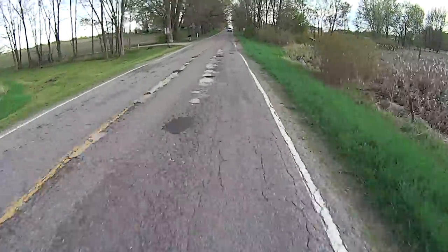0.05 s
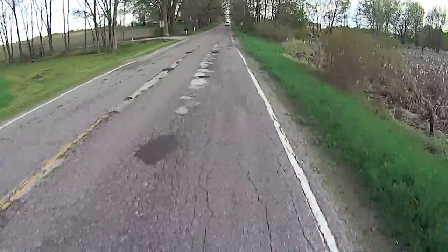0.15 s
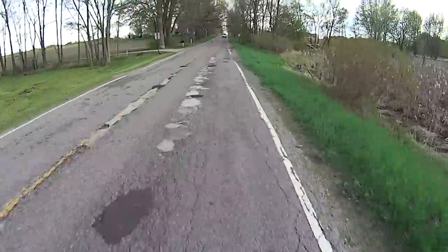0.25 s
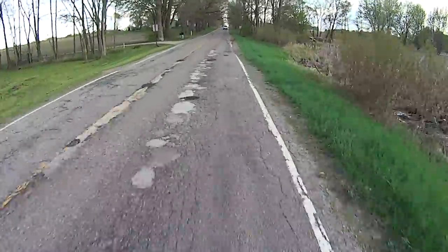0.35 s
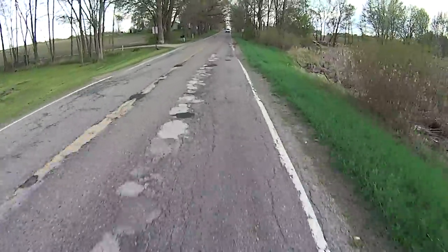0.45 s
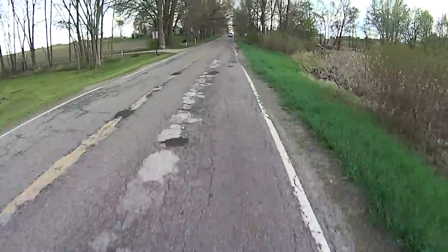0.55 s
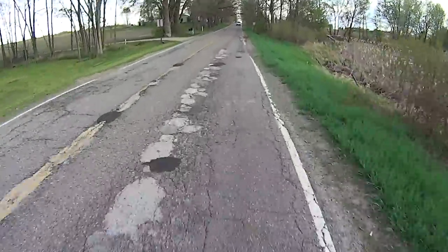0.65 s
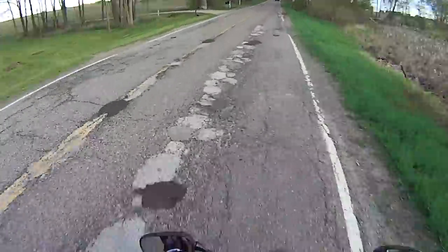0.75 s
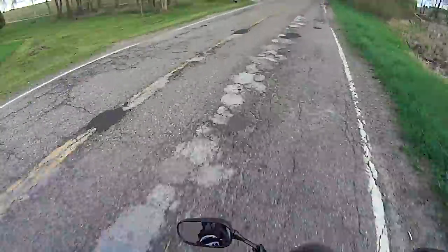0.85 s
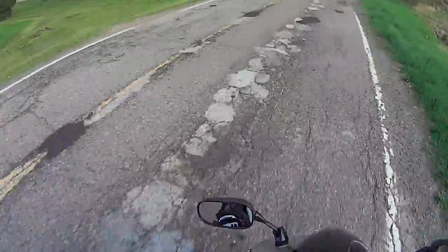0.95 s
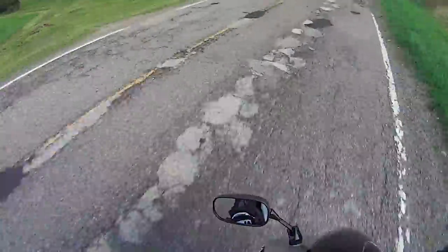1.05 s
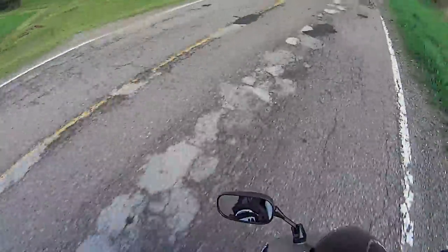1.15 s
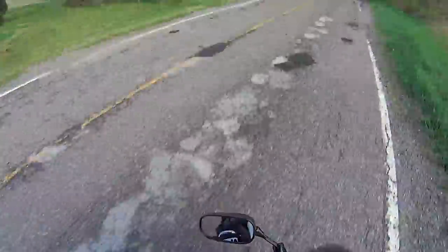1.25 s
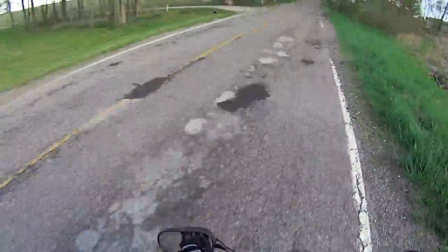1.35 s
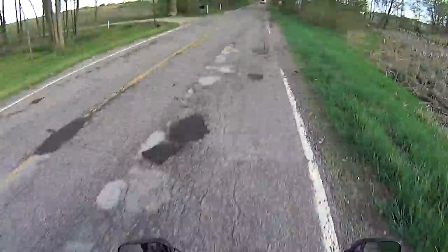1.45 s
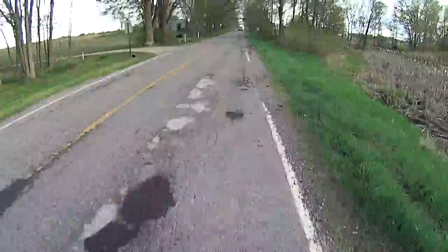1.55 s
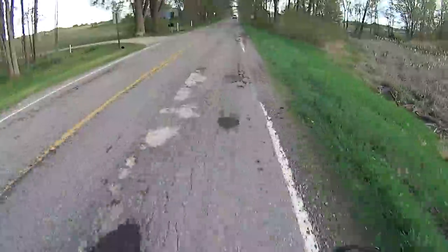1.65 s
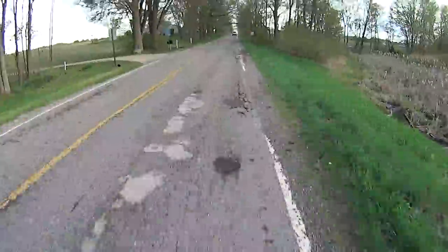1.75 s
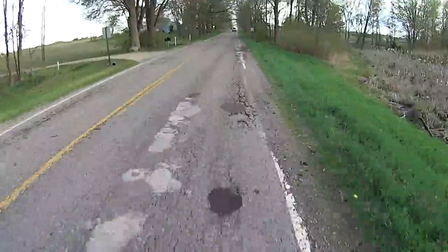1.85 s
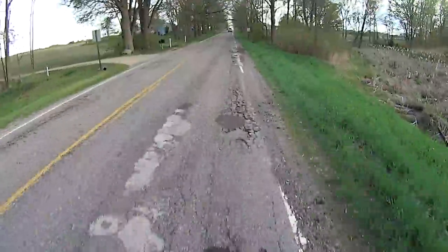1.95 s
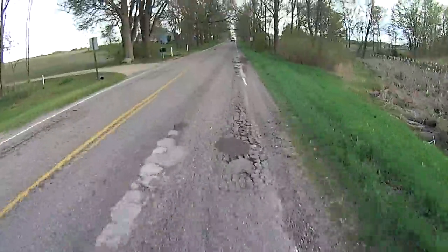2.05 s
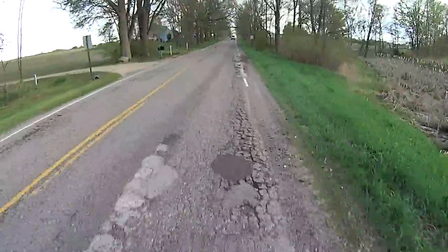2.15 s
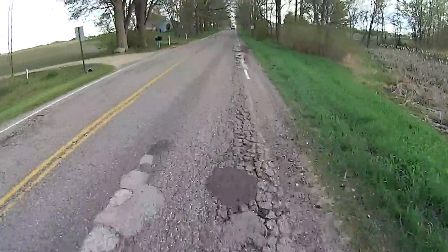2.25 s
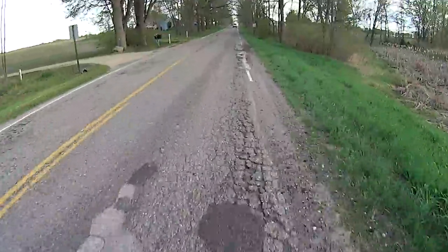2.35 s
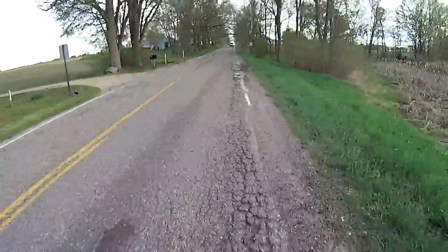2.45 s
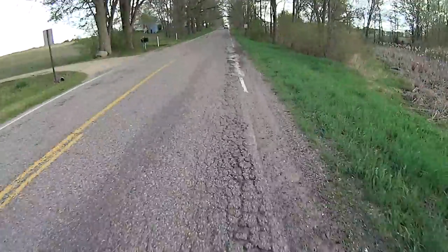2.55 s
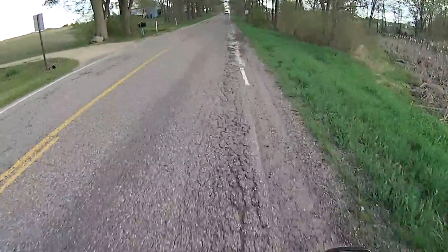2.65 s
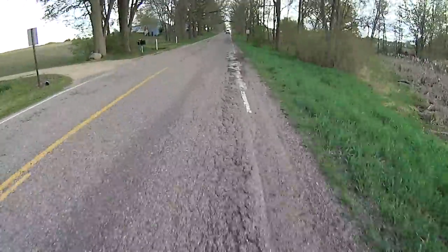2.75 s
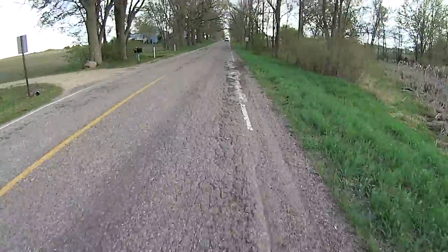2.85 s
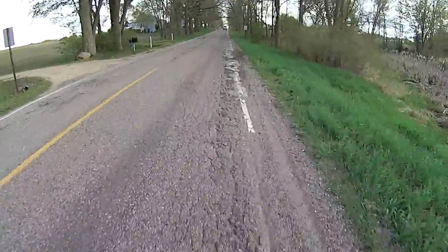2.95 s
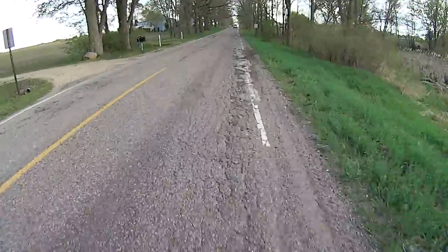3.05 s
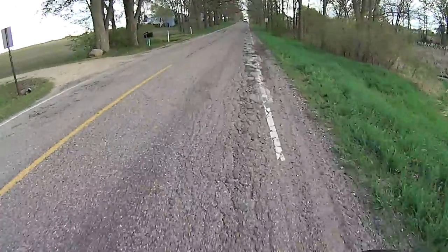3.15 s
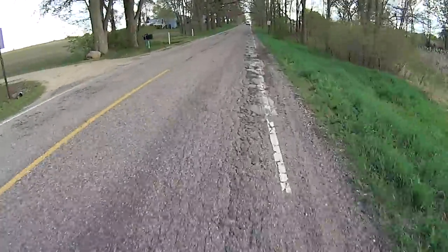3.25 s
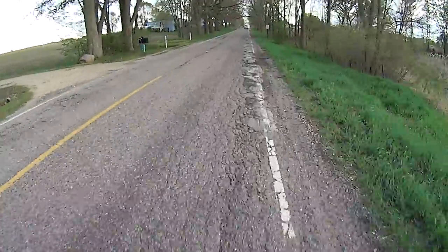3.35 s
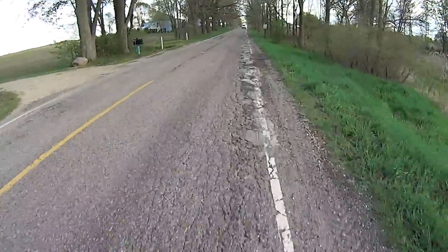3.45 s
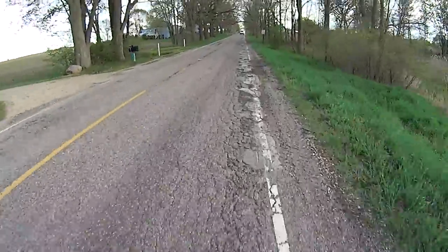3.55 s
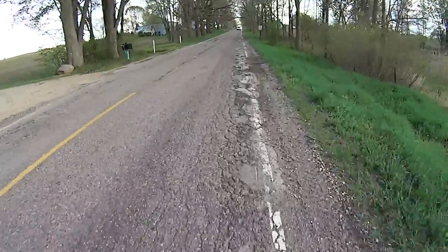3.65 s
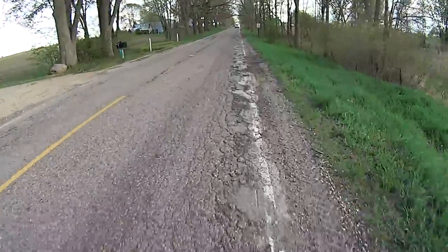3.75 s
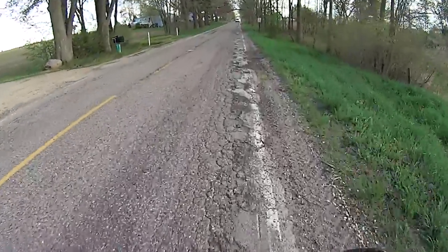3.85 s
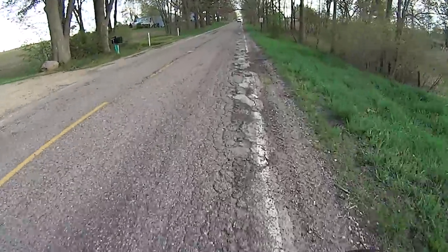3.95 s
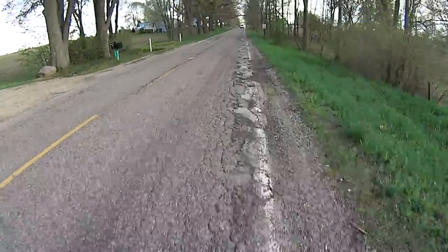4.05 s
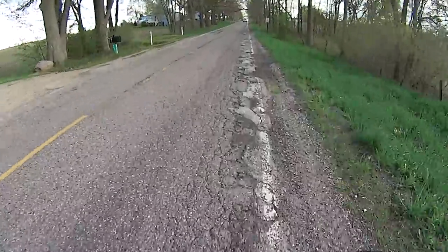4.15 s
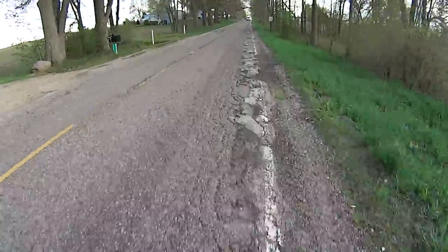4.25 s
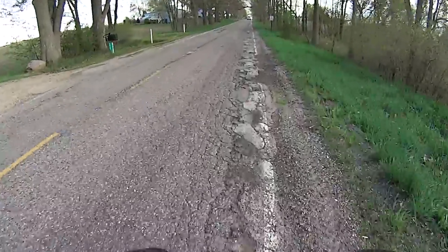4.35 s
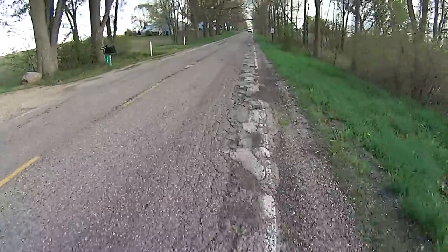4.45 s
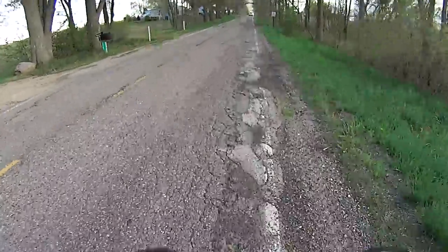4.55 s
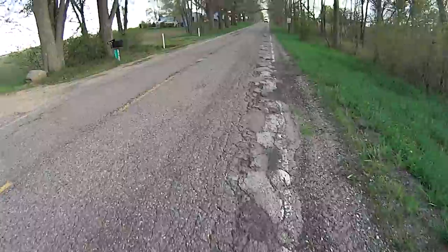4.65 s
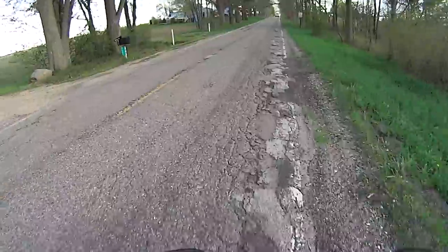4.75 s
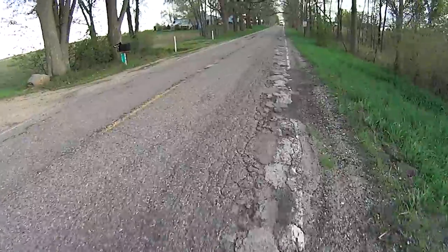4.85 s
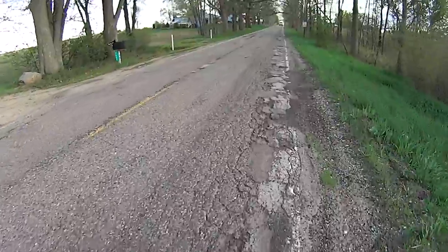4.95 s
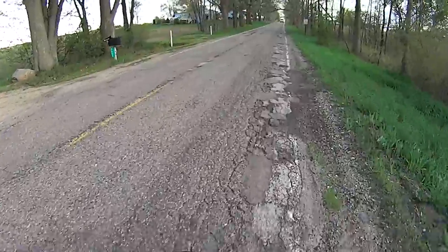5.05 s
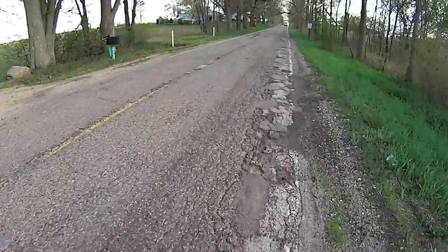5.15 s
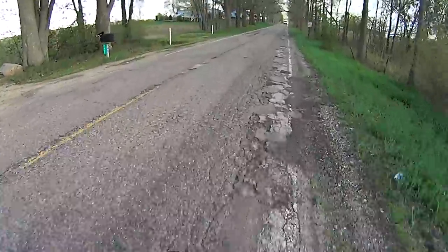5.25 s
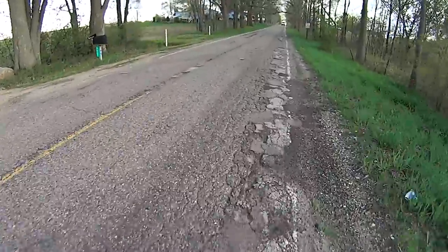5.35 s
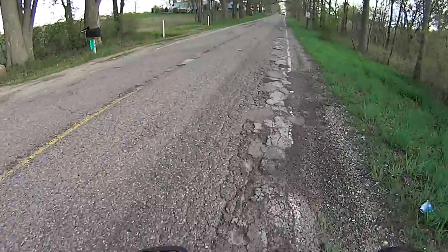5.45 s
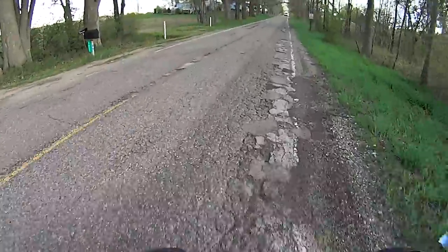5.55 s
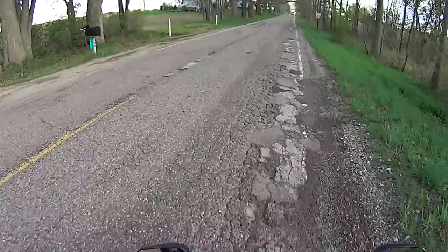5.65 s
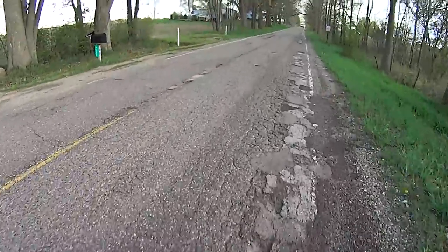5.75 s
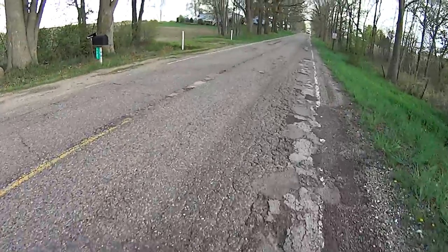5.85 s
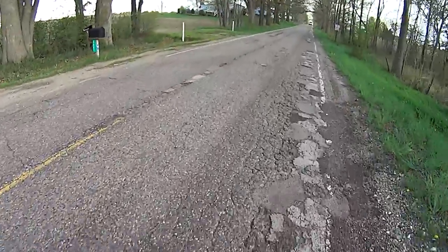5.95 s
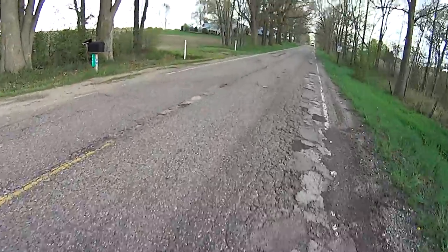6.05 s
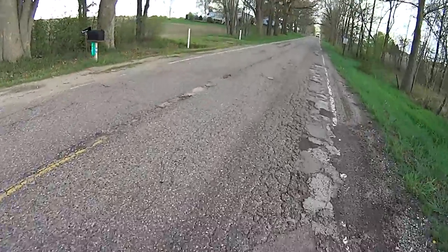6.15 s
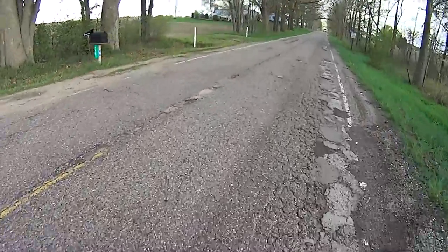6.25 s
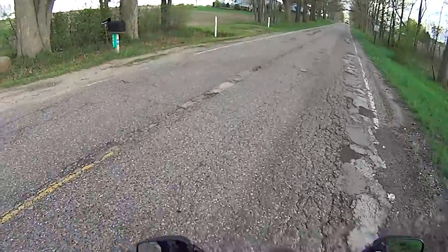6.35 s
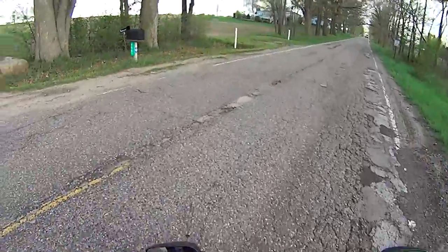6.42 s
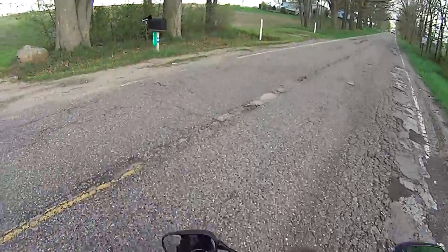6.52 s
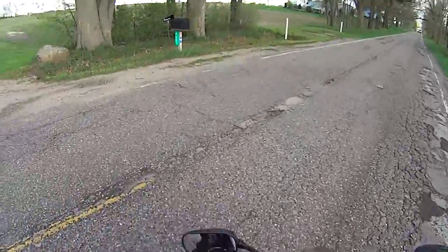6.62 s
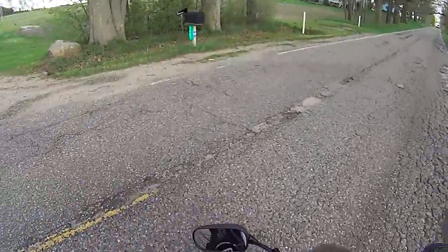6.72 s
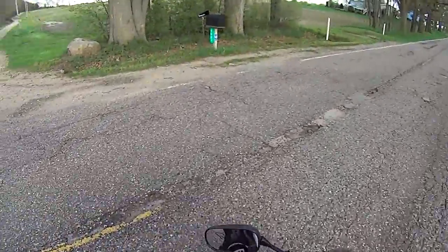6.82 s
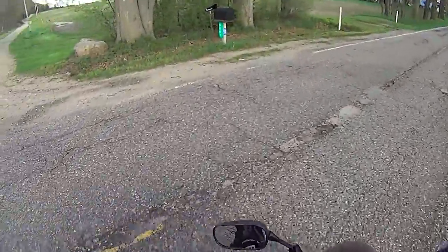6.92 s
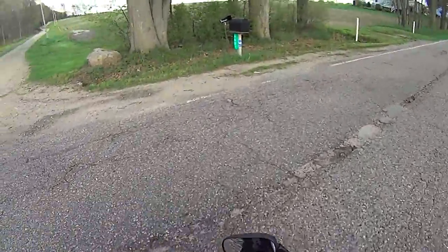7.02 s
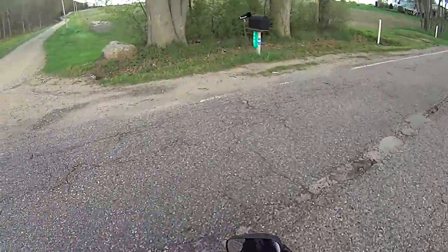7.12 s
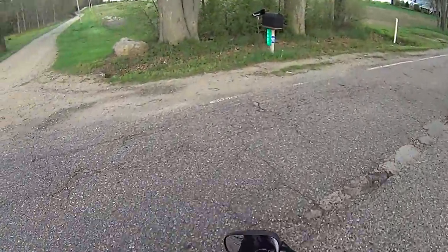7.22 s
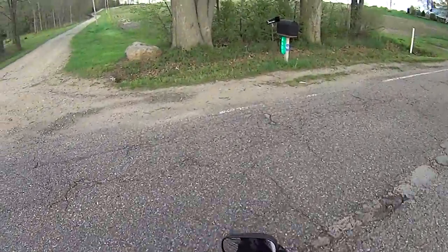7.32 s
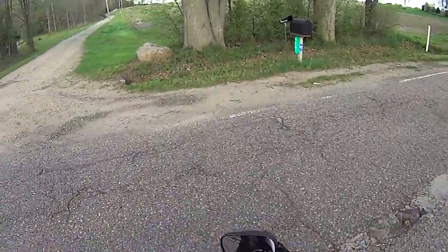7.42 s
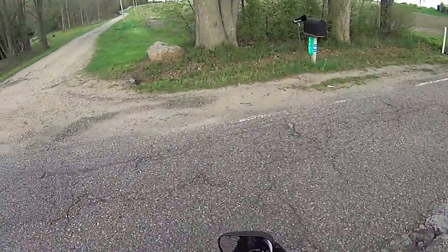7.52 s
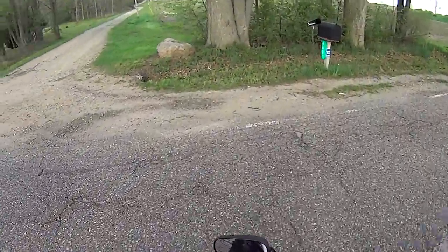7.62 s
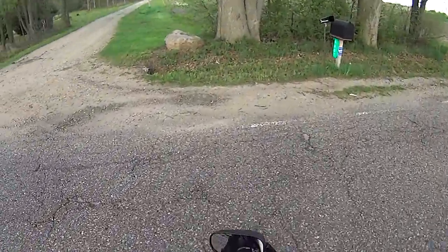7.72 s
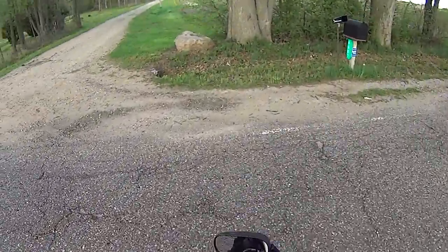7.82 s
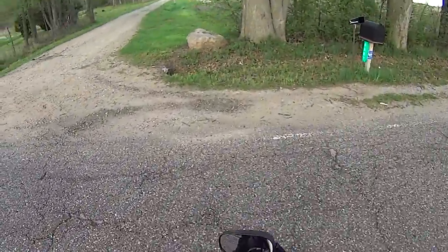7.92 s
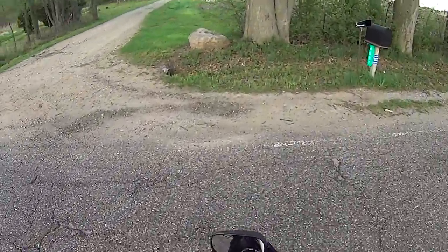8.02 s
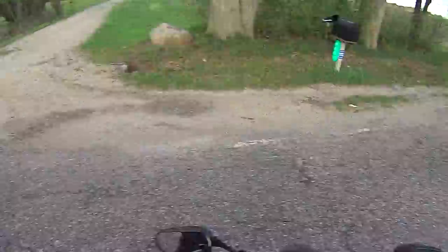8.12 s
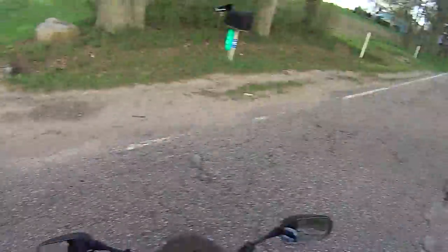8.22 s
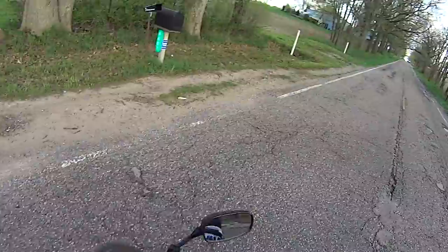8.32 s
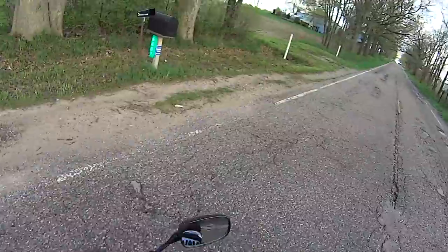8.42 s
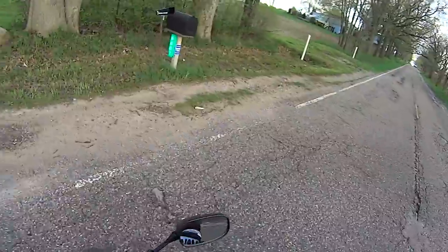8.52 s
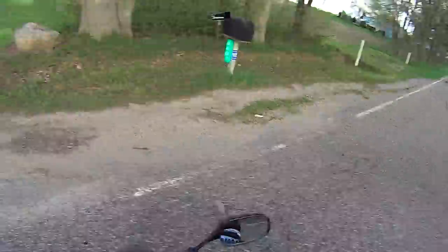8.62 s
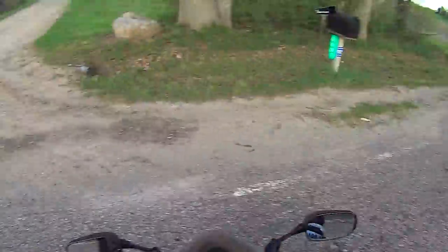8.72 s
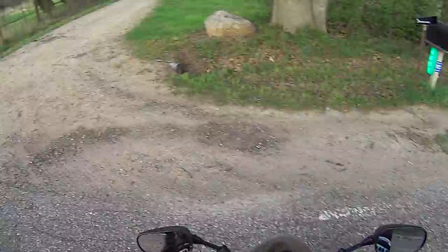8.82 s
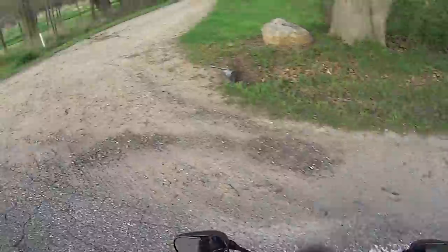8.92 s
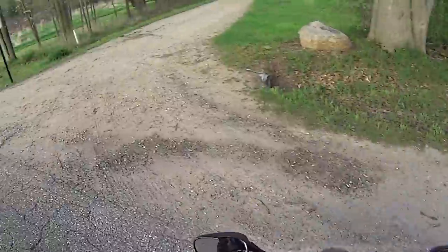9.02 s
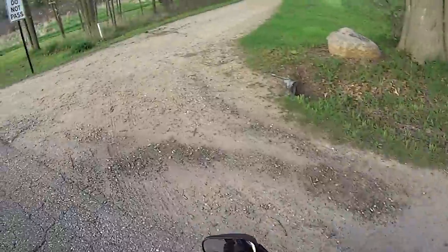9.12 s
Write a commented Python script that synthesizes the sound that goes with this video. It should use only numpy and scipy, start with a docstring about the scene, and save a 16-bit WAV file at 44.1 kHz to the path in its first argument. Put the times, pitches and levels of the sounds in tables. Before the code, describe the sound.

Close on a motorcycle, from a microphone in a hollow plastic case: strong wind rush with a breathy whistle and chain rattle. The engine hums lower, jumps up at a downshift, then sinks to a steady idle. Sharp plasticky clacks and dull thuds punctuate the slowing ride over broken asphalt. Wind thins out, leaving mechanical chatter, faint brake chirps and soft hiss.

```python
"""A motorcycle coasts down a cracked country road to walking pace, heard by a rider's camera in a plastic case.
The engine drops a gear and falls to idle: sines at its orders slide through exhaust resonances, over ticks and grains.
Wind, tyre rumble and chain rattle are shaped noise or grains that fade with the speed; cavities whistle in the air.
Clacks from the slack drive ring the modes of the case; dull knocks, heaves and shaking come through the mount.
The brake disc chirps in narrow bands of noise, over a steady soft hiss."""
import sys
import numpy as np
from scipy import signal
from scipy.fft import rfft, irfft, next_fast_len
from scipy.io import wavfile
from scipy.ndimage import uniform_filter1d

SR = 44100
rng = np.random.default_rng(int(sys.argv[2]) if len(sys.argv) > 2 else 0)


def persist_wave(psi):
    """Save psi, clipped to +-1, as 16-bit WAV."""
    counts = np.round(np.clip(psi, -1, 1) * 32767).astype(np.int16)
    wavfile.write(sys.argv[1], SR, np.atleast_2d(counts).T)


N = 404827
TIME = np.arange(N) / SR  # s
SIZE = next_fast_len(N + 16384, real=True)  # padded so that filter tails do not wrap round
FREQ = np.maximum(np.arange(SIZE // 2 + 1) * SR / SIZE, 1)  # Hz


def undb(db):
    """Decibels to gain."""
    return 10 ** (np.asarray(db) / 20)


def power_db(ratio, power):
    """Decibels gained by a level that goes as a power of a ratio."""
    return 20 * power * np.log10(np.maximum(ratio, 1e-3))


def unit(x):
    """Scale to rms 1."""
    return x / np.sqrt(np.mean(x ** 2))


def curves(table):
    """The columns of a table, joined by straight lines in time."""
    s, *columns = np.transpose(table)
    return [np.interp(TIME, s, column) for column in columns]


def swell(centre_s, length_s):
    """A bell-shaped rise and fall, down to 1/e at length_s either side of its centre."""
    return np.exp(-((TIME - centre_s) / length_s) ** 2)


def noise():
    """White noise."""
    return rng.standard_normal(N)


def walk(rate):
    """Random levels held 1 / rate s and slewed twice; spread near 1."""
    hold = int(SR / rate)
    held = np.repeat(rng.standard_normal(N // hold + 1), hold)
    return 1.3 * uniform_filter1d(uniform_filter1d(held, hold), hold)[:N]


def shape(x, response):
    """Filter by a frequency response."""
    return irfft(rfft(x, SIZE) * response, SIZE)[..., :N]


def resonance(f, hz, width):
    """A resonance applied twice, so that its skirts are steep."""
    return (1 + 1j * (f / hz - hz / f) * hz / width) ** -2


def ports(pan_db, lead):
    """Gain and phase with which a mode reaches the two microphone ports, left then right."""
    side = np.array([[1], [-1]]) / 2
    return undb(side * pan_db) * np.exp(1j * side * lead)


def body(modes):
    """Causal stereo response of a set of modes; at each frequency the strongest ones set the direction."""
    hz, width, db, pan_db, lead = np.transpose(modes)[..., None]
    f = FREQ[::16]
    power = (undb(db) * abs(resonance(f, hz, width))) ** 2 + 1e-9
    total = power.sum(0)
    share = power / total
    phase = np.unwrap(np.angle((share * np.exp(1j * lead)).sum(0)))
    log_gain = np.interp(FREQ, f, np.log(total) / 2)
    pan_db = np.interp(FREQ, f, (share * pan_db).sum(0))
    phase = np.interp(FREQ, f, phase)
    # minimum phase: the ring follows the blow
    cepstrum = irfft(log_gain, SIZE)[:SIZE // 2]
    cepstrum[1:] *= 2
    return np.exp(rfft(cepstrum, SIZE)) * ports(pan_db, phase)


def add(out, s, sound):
    """Mix a short sound in at time s."""
    i = max(int(s * SR), 0)
    out[..., i:i + sound.shape[-1]] += sound[..., :N - i]


# the bike slowing down: (time [s], road speed [m/s])
ROAD_SPEED = [(0, 13.7), (.33, 13.2), (.72, 10.9), (1.05, 8.77), (2.0, 7), (3.3, 5.3), (4.1, 3.65),
              (6.2, 3.18), (7.2, .9), (9.18, 1.55)]
REFERENCE_M_S, BREEZE_M_S = 14.26, 4.37  # speed at which levels are given; air that moves even at rest


def pace_and_airflow():
    """Road speed and air speed over the reference speed; the breeze adds to the air in quadrature."""
    speed, = curves(ROAD_SPEED)
    return speed / REFERENCE_M_S, np.hypot(speed, BREEZE_M_S) / REFERENCE_M_S


# revs, with one downshift and then idle: (time [s], firing rate [Hz])
FIRING_RATE = [(0.0, 101.8), (0.59, 83.9), (0.84, 112.7), (1.0, 119.8), (1.25, 118.3), (1.48, 106.2),
               (1.69, 83.3), (2.38, 57.5), (2.53, 56.25), (3.04, 58.4), (3.3, 54.97), (4.37, 58.6),
               (4.6, 54.8), (4.73, 58.55), (6.29, 55.6), (8.1, 55.9), (8.44, 52.03), (9.18, 49.9)]


def revs():
    """Firing rate, and a count of firings that strays slightly from it as the engine runs unevenly."""
    firing_hz, = curves(FIRING_RATE)
    return firing_hz, np.cumsum(firing_hz * (1 + .008 * walk(7))) / SR


# the drive takes up load: (half-bite time [s], half-release time [s], exhaust gain [dB], clatter gain [dB])
CLUTCH_LOADS = [(0.794, 1.49, 14.5, 2.5), (1.1, 1.383, -1.5, 2), (1.6, 1.896, 5.5, 4),
                (6.307, 7.0, 1.5, 2.5), (8.276, 8.85, -0.5, 3)]
CLUTCH_S = .2  # time it takes to bite or let go


def load():
    """Decibels that the biting clutch adds to the exhaust and to the clatter."""
    hum_db, clatter_db = 0, 0
    for start, end, hum_gain_db, clatter_gain_db in CLUTCH_LOADS:
        bite = np.clip(.5 + np.minimum(TIME - start, end - TIME) / CLUTCH_S, 0, 1)
        hum_db = hum_db + hum_gain_db * bite
        clatter_db = clatter_db + clatter_gain_db * bite
    return hum_db, clatter_db


# resonances of the exhaust pipe: (frequency [Hz], width [Hz], relative level [dB])
PIPE_MODES = [(55.7, 16.3, 3.5), (104.4, 19, 0.5), (224.2, 27, 0), (266, 50, 2), (466, 65, -23)]
HUM_DB = -47.5  # engine orders with no load


def exhaust(firing_hz, firings, load_db, odd_db, half_db, waver_db, burble_db):
    """Engine orders slide through the resonances of the pipe; gas burbles at high revs."""
    hum = 0
    for half in range(2, 19):
        order = half / 2
        # even orders lead; unequal cylinders leave weak lines between the whole orders
        order_db = half_db if half % 2 else odd_db * (order % 2)
        order_hz = order * firing_hz[::64]
        gain = sum(undb(db) * abs(resonance(order_hz, hz, width)) for hz, width, db in PIPE_MODES)
        gain = np.interp(TIME, TIME[::64], gain) * undb(order_db + waver_db * walk(17))
        hum = hum + gain * np.sin(2 * np.pi * (order * firings + rng.random()))
    puffs = noise() * (1 + np.cos(2 * np.pi * firings))
    gas = unit(shape(puffs, resonance(FREQ, 158, 170)))
    burble = undb(burble_db) * gas * (firing_hz / firing_hz.max()) ** 3
    return undb(HUM_DB + load_db) * (unit(hum) + burble) * ports(-1.8, 0).real


# modes of the case: (frequency [Hz], width [Hz], relative level [dB], left minus right [dB], left lead [rad])
CASE_MODES = [(454, 122, -8.5, -0.3, -2.5), (785, 108, -18, 6.5, -1.15), (1081, 135, -11.5, 3.5, -1.26),
              (1504, 250, -4, -2.5, 0.0), (1660.4, 218, 2, -1.5, 0.32), (1846, 117, -6.5, 5, 1.34),
              (2086, 230, -14.5, -15, 0.0), (2610, 120, -17, 10, 3), (2840, 126, -18, 10, 3),
              (3172, 360, -19.5, -1.5, 0.5), (3860, 1300, -30.5, 3, 3.5), (4550, 120, -34, -20, -2),
              (5126, 410, -21.5, -2.5, 0.5), (5800, 770, -31.5, 0, 4), (7450, 480, -33, 4, 2.1),
              (8920, 1900, -40, 0.2, 1.5)]


def case_response():
    """The hollow plastic case, rung by the clatter and the clacks."""
    return body(CASE_MODES)


IDLE_HZ = 56  # firing rate at which the gear level is given
GEARS_DB, GEARS_POWER = -34.5, 0.89  # unloaded gear clatter at idle, and the power of the revs it goes as
CHAIN_DB, CHAIN_POWER = -26.5, 0.75  # unloaded chain rattle at reference speed, and its power of the speed


def clatter(firing_hz, firings, pace, load_db, case, tick_db, scatter_db, throb, grain_db, flutter_db):
    """A tick at every firing over a dense rattle of gears and chain that throbs with it."""
    ticks = np.diff(np.floor(firings), prepend=0) * undb(scatter_db * walk(90))
    # 1500 grains a second, of random sign and size
    grains = (rng.random(N) < 1500 / SR) * np.sign(noise()) * undb(grain_db * noise())
    rattle = grains * (1 + throb * np.cos(2 * np.pi * firings))
    drive = (unit(rattle) + undb(tick_db) * unit(ticks)) * undb(flutter_db * walk(26))
    gears = undb(GEARS_DB + power_db(firing_hz / IDLE_HZ, GEARS_POWER))
    chain = undb(CHAIN_DB + power_db(pace, CHAIN_POWER))
    return unit(shape(drive, case)) * np.hypot(gears, chain) * undb(load_db)


# colour of the wind rush: (frequency [Hz], relative level [dB])
RUSH_COLOUR = [(20, -10), (60, 3), (105, 4), (200, 4.5), (320, 1.5), (450, -4), (750, -1.5), (1050, -1),
               (2200, -1), (2600, -10.5), (3900, -19), (6200, -23.5), (9300, -30), (10500, -53)]
RUSH_DB, RUSH_POWER = -27.5, 2.036  # wind at reference air speed, and the power of the air speed it goes as


def wind(airflow, eddy_db, flicker_db, side_db, bass_slope):
    """Eddies beat on the case; their rumble dies faster than their hiss as the speed falls."""
    rush_db = RUSH_DB + power_db(airflow, RUSH_POWER)
    hz, db = np.transpose(RUSH_COLOUR)
    colour = undb(np.interp(np.log(FREQ), np.log(hz), db))
    low = 1 / (1 + (FREQ / 330) ** 4)
    # above the rumble the right port hears the stream first
    lead = -1.7 * (1 - low) / (1 + (FREQ / 1250) ** 6)
    eddies = undb(eddy_db * walk(30))
    out = 0
    for share, slope in ((low, bass_slope), (1 - low, 0)):
        stream = noise() + undb(side_db) * noise() * np.array([[1], [-1]])
        fade_db = slope * (rush_db - rush_db.max())
        stream = stream * eddies * undb(flicker_db * walk(70) + fade_db)
        out = out + shape(stream, colour * share * ports(0, lead))
    return out / np.sqrt(np.mean(colour ** 2)) * undb(rush_db)


# cavity tones: (frequency [Hz], width [Hz], relative level [dB], left minus right [dB], left lead [rad])
CAVITY_TONES = [(3254, 330, -2.5, -2, -0.67), (4600, 410, -7, 2, 0), (5098, 300, 3, -5, 0.083),
                (5500, 790, -26, 13, .5)]
WHISTLE_DB, WHISTLE_POWER = -30, 3.33  # at reference air speed; a steeper power of the air speed than the rush


def whistle(airflow, flicker_db):
    """Fast air blows the cavities of the case and lets go as the bike slows."""
    tone = unit(shape(noise() * undb(flicker_db * walk(25)), body(CAVITY_TONES)))
    return tone * undb(WHISTLE_DB + power_db(airflow, WHISTLE_POWER))


# rough patches of road that shake the mount: (time [s], length [s], level [dB])
ROUGH_PATCHES = [(2.6, .3, -48), (4.55, 0.33, -44), (5.42, 0.16, -46), (6.24, .06, -36.5),
                 (6.48, .07, -34.5), (8.28, .06, -49)]
SHAKE_DB, SHAKE_POWER = -39.5, 1.1  # shaking at reference speed, and the power of the speed it goes as


def shake(pace, hz, width_hz):
    """The road shakes the mount at its lowest mode, more at speed and on rough patches."""
    power = undb(SHAKE_DB + power_db(pace, SHAKE_POWER)) ** 2
    for s, length_s, db in ROUGH_PATCHES:
        power = power + (undb(db) * swell(s, length_s)) ** 2
    return unit(shape(noise(), resonance(FREQ, hz, width_hz))) * np.sqrt(power)


TYRE_DB, TYRE_POWER = -39.5, 0.87  # rumble at reference speed, and the power of the speed it goes as


def tyres(pace, hz, width_hz, flicker_db):
    """Coarse asphalt drums through the frame into the mount."""
    drumming = noise() * undb(flicker_db * walk(22))
    drumming = shape(drumming, resonance(FREQ, hz, width_hz) * ports(0, -1.43))
    return unit(drumming) * undb(TYRE_DB + power_db(pace, TYRE_POWER))


def hiss(level_db):
    """Steady white noise, independent left and right."""
    return undb(level_db) * rng.standard_normal((2, N))


# the slack drive clacks in short runs; the single row at 0.999 s is the knock at 0.997 s ringing the case: #
# (time [s], clacks in the run [count], first peak before trim [dB], change per clack [dB])
CLACK_RUNS = [(.57, 1, -6.5, -1), (0.8982, 1, -11.5, 0), (0.999, 1, -15, 0), (1.1599, 1, -9.5, 0),
              (1.249, 2, -12.5, -2), (1.7083, 2, -10, -8), (2.2005, 1, -7, 0), (2.368, 2, -12, 3.5),
              (2.711, 4, -11.5, -2), (3.034, 2, -13, 1.5), (3.3122, 1, -16, 0), (3.706, 2, -14, .5),
              (4.2847, 1, -16, 0), (4.5333, 1, -12, 0), (4.6333, 1, -13, -2), (6.0478, 1, -8.5, 0),
              (6.2425, 1, -16, -2), (6.312, 2, -14.5, 3), (6.4677, 1, -18.5, 0)]
SWING_S = .0803  # one swing of the slack chain
STRAY_PER_S, STRAY_DB, STRAY_SPREAD_DB = 4, -17, 4  # lone clacks at reference speed: rate, mid peak, +/- spread


def slaps(pace):
    """Time and peak dB of each clack: one per swing in a run, and strays that thin out and weaken with the speed."""
    runs = [(s + k * SWING_S, db + k * step_db)
            for s, count, db, step_db in CLACK_RUNS for k in range(round(count))]
    expected = np.cumsum(STRAY_PER_S * pace) / SR
    chance = rng.random((int(expected[-1]), 2))
    # one stray at a random place within each unit of the expected count
    places = np.searchsorted(expected, np.arange(len(chance)) + chance[:, 0])
    strays = []
    for i, size in zip(places, chance[:, 1]):
        db = STRAY_DB + power_db(pace[i], CHAIN_POWER) + STRAY_SPREAD_DB * (2 * size - 1)
        strays.append((i / SR, db))
    return runs + strays


def clacks(hits, case, trim_db, bounce_s, bounce, scuff_db, scuff_s, soft_hz, shudder_db, shudder_s):
    """The slack drive snaps tight, rebounds and scuffs; each blow rings the case and leaves the frame shuddering."""
    blows, shudder, t = np.zeros(N), np.zeros(N), TIME[:SR // 7]
    for s, db in hits:
        blow = undb(scuff_db) * rng.standard_normal(len(t)) * t / scuff_s * np.exp(-t / scuff_s)
        blow[0] += 1
        for k in (1, 2):
            add(blow, bounce_s * (k + rng.uniform(-.2, .2)), np.array([bounce ** k]))
        add(blows, s, undb(db) * blow)
        add(shudder, s, undb(db + shudder_db) * np.exp(-t / shudder_s))
    # the contact lasts long enough to dull the treble
    ring = case / (1 + 1j * FREQ / soft_hz)
    ring = ring / abs(irfft(ring, SIZE)).max()
    frame = unit(shape(noise(), resonance(FREQ, 500, 1200) * ports(0, -1.55)))
    return undb(trim_db) * shape(blows, ring) + shudder * frame


# dull knocks: (time [s], ring peak before trim [dB], contact softness as cut-off [Hz], rattle over ring [dB])
DULL_KNOCKS = [(0.802, -11, 800, -9.5), (0.812, -12.5, 149, -8), (0.858, -21, 600, -7),
               (0.997, -21, 3000, 3), (1.295, -20.5, 245.6, -9), (4.404, -9, 1300, -12),
               (4.547, -8, 350, -14), (4.623, -22, 350, -15), (5.278, -24, 450, -15),
               (6.425, -23, 399.6, -16), (7.86, -35.5, 902, -8), (8.11, -33, 1600, -1),
               (8.469, -30, 300, -12)]
# modes of the mount: (frequency [Hz], time to fall 60 dB [s], relative level [dB], left lead [rad])
MOUNT_MODES = [(72.6, 0.077, -9, 0.54), (175, 0.034, -7.5, -1.1), (228, 0.056, -1.5, 0.35),
               (411, 0.054, 7.5, -1.6), (528, 0.14, -8, -2.1), (820, 0.035, 4.5, -1.8), (980, 0.045, -6, 1)]


def knocks(trim_db, rattle_s):
    """Blunt blows and a short rattle ring the mount; a softer contact leaves only the low modes."""
    out, t = np.zeros((2, N)), TIME[:SR // 5]
    for s, db, soft_hz, rattle_db in DULL_KNOCKS:
        ring = 0
        for hz, t60, mode_db, lead in MOUNT_MODES:
            gain = undb(mode_db - 60 * t / t60) / (1 + (hz / soft_hz) ** 2)
            ring = ring + (gain * ports(-0.45, lead) * np.exp(2j * np.pi * hz * t)).imag
        ring = ring * (1 - np.exp(-t / 0.0016))
        dull = resonance(FREQ, 550, 950) / (1 + 1j * FREQ / soft_hz)
        rattle = unit(shape(noise(), dull * ports(0, -1.66))[:, :len(t)])
        rattle = undb(rattle_db) * rattle * np.exp(-t / rattle_s) * (1 - np.exp(-t / 0.001))
        add(out, s, undb(db + trim_db) * (ring / abs(ring).max() + rattle))
    return out


# brake pads rubbing the disc: (time [s], level before the disc modes [dB])
BRAKE_RUB = [(1.9, -87), (2.4, -64), (4.5, -66), (5.5, -70), (6.3, -61), (6.7, -70), (9.18, -77)]
# modes of the disc: (frequency [Hz], width [Hz], relative level [dB], flicker up or down [dB], left lead [rad])
DISC_MODES = [(6100, 150, -17, 3, 1), (6840, 14, -7, -1, 1.8), (6820, 18, -5, 0.5, 0.91),
              (6950, 200, -7, 2, 1.6), (7490, 180, -5, 10, .3)]


def brake():
    """The pads catch the disc now and then; each of its modes chirps on its own."""
    level_db, = curves(BRAKE_RUB)
    out = 0
    for hz, width, db, flicker_db, lead in DISC_MODES:
        tone = unit(shape(noise(), resonance(FREQ, hz, width) * ports(0, lead)))
        out = out + tone * undb(db + flicker_db * np.tanh(walk(24)))
    return out * undb(level_db)


# suspension heaves: (time [s], level [dB])
SUSPENSION_HEAVES = [(2.573, -30.5), (4.6, -38), (6.43, -32.5)]


def heaves(hz, length_s):
    """A bump sways the camera for a cycle or two."""
    return sum(undb(db) * swell(s, length_s) * np.sin(2 * np.pi * hz * (TIME - s))
               for s, db in SUSPENSION_HEAVES)


def whine(hz, width_hz, db, centre_s, length_s):
    """A thin mechanical whine, a narrow band of noise, swells and fades."""
    tone = unit(shape(noise(), resonance(FREQ, hz, width_hz)))
    return tone * undb(db) * swell(centre_s, length_s)


def scene():
    """Road speed, revs and clutch drive engine, chain, wind and mount; the brake chirps over a soft hiss."""
    pace, airflow = pace_and_airflow()
    firing_hz, firings = revs()
    hum_load_db, clatter_load_db = load()
    case = case_response()
    engine = exhaust(firing_hz, firings, hum_load_db, odd_db=-1, half_db=-5.5, waver_db=2.0, burble_db=-0.5)
    engine += clatter(firing_hz, firings, pace, clatter_load_db, case, tick_db=-9.5, scatter_db=-1.0,
                      throb=0.041, grain_db=1.0, flutter_db=0.58)
    engine += whine(hz=2554, width_hz=45, db=-56.0, centre_s=7.8, length_s=0.66)
    air = wind(airflow, eddy_db=0.17, flicker_db=2.5, side_db=-7.0, bass_slope=0.27)
    air += whistle(airflow, flicker_db=2.0)
    road = shake(pace, hz=71.7, width_hz=16) + tyres(pace, hz=408, width_hz=236, flicker_db=4.5)
    blows = clacks(slaps(pace), case, trim_db=0.6, bounce_s=.0042, bounce=0.48, scuff_db=-27.5,
                   scuff_s=0.0061, soft_hz=7500, shudder_db=-28.5, shudder_s=0.051)
    blows += knocks(trim_db=1, rattle_s=0.0077) + heaves(hz=30.01, length_s=0.028)
    squeaks = brake() + whine(hz=6120, width_hz=202, db=-59, centre_s=3.81, length_s=0.048)
    return engine + air + road + blows + squeaks + hiss(level_db=-56.0)


TOP_HZ = 10950  # edge of the treble cut


def record(dry):
    """The camera cuts the top with a steep low-pass."""
    return signal.sosfilt(signal.ellip(12, .2, 80, TOP_HZ, fs=SR, output="sos"), dry)


dry = scene()
out = record(dry)
persist_wave(out)
```